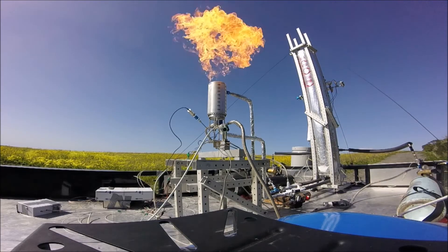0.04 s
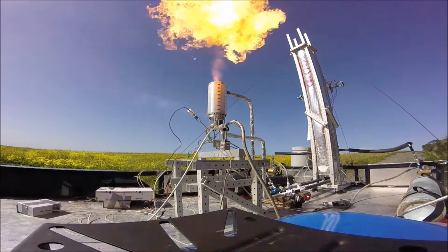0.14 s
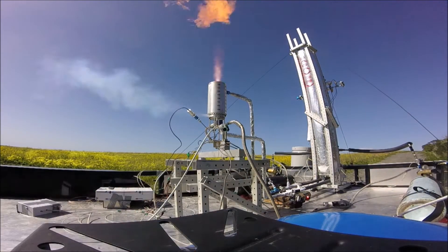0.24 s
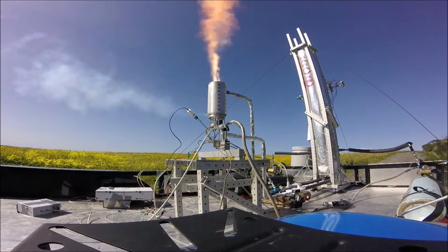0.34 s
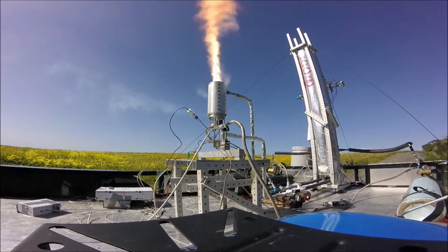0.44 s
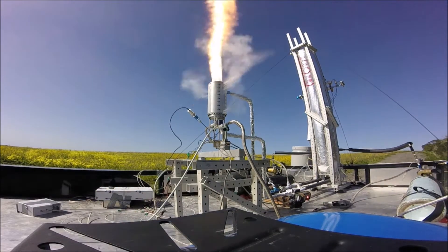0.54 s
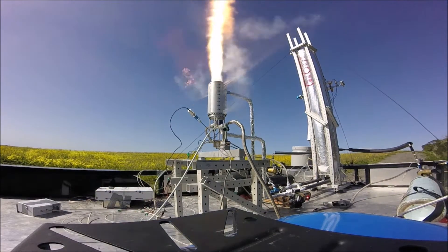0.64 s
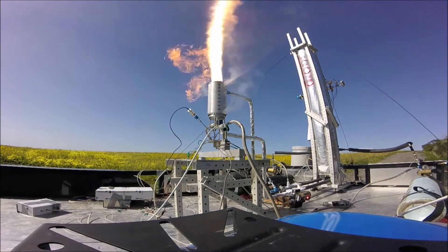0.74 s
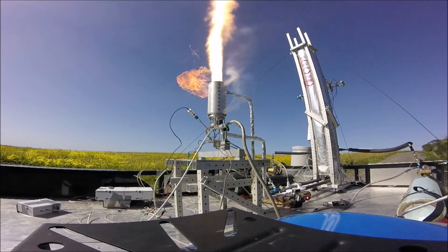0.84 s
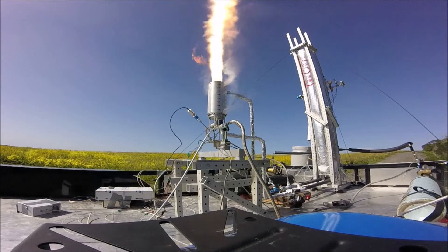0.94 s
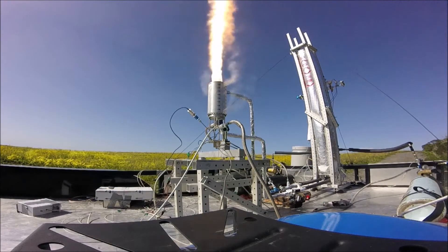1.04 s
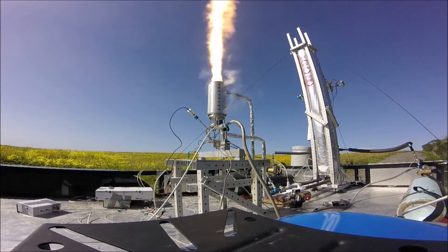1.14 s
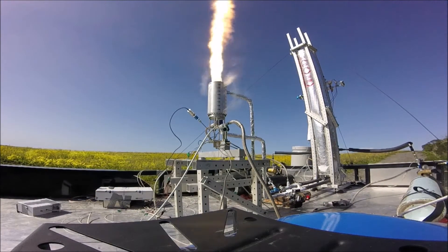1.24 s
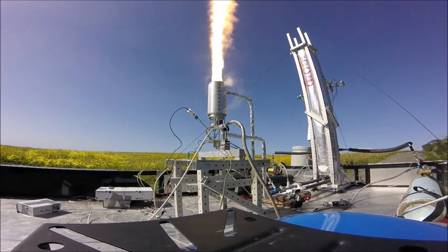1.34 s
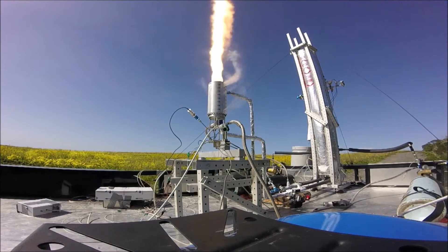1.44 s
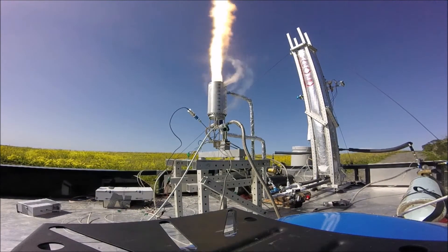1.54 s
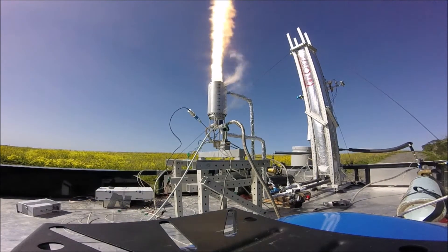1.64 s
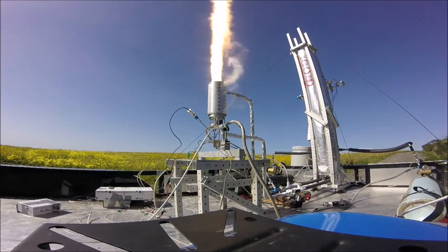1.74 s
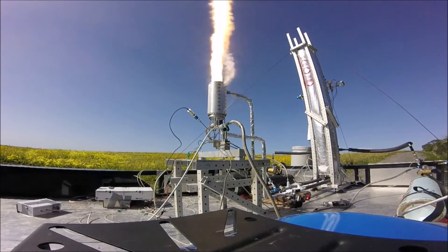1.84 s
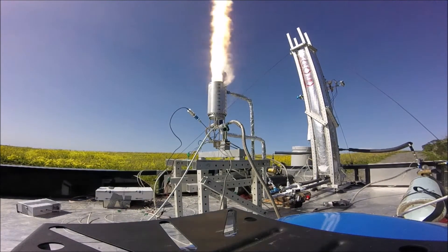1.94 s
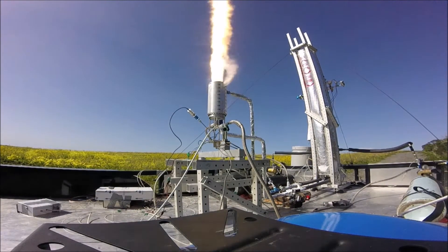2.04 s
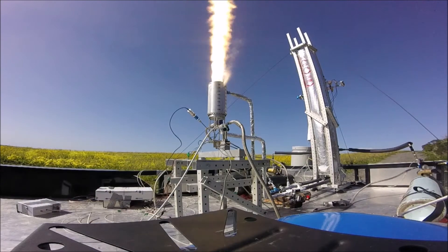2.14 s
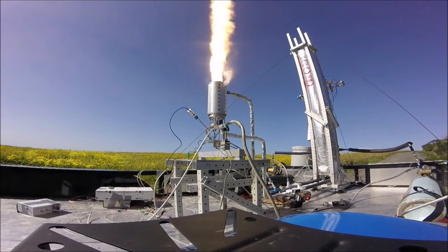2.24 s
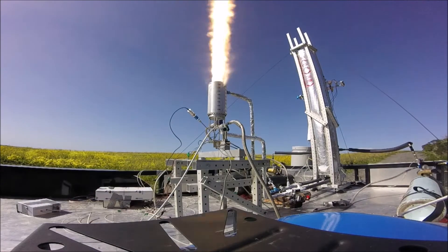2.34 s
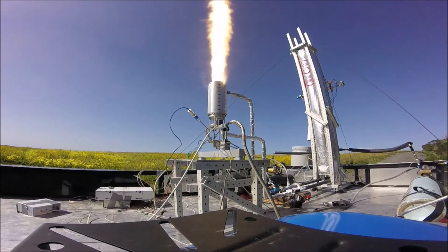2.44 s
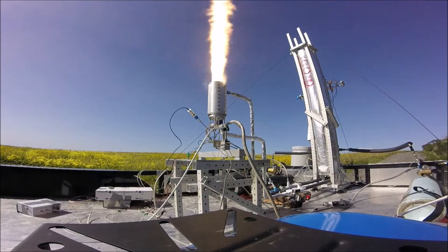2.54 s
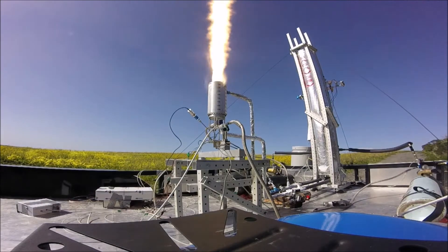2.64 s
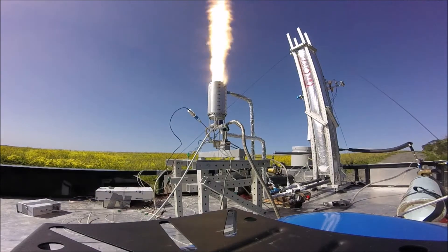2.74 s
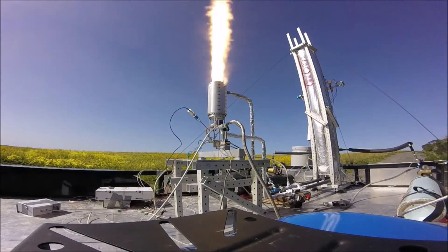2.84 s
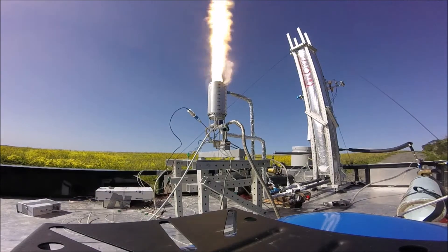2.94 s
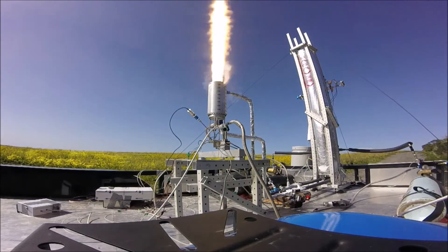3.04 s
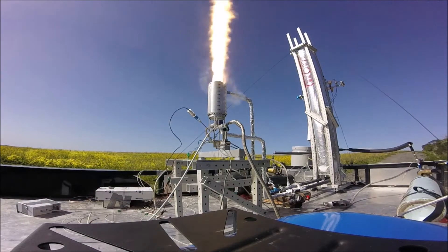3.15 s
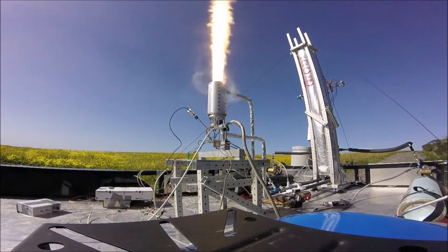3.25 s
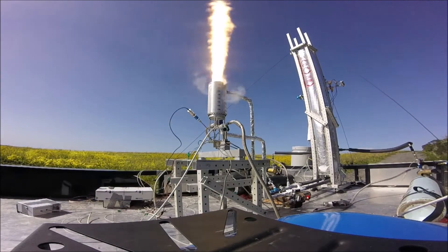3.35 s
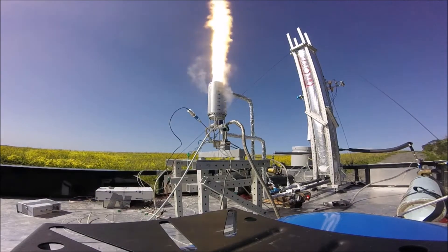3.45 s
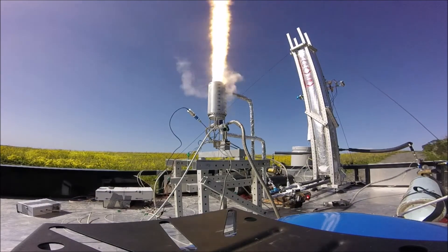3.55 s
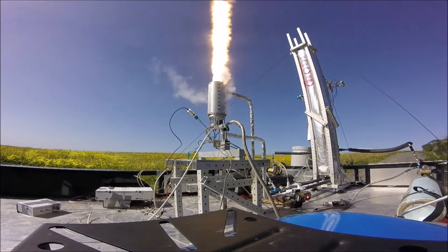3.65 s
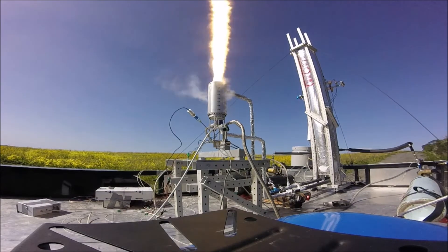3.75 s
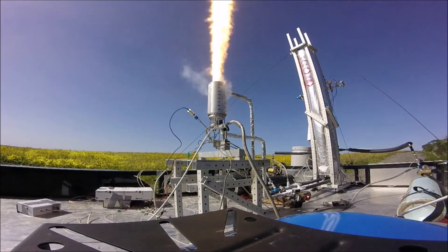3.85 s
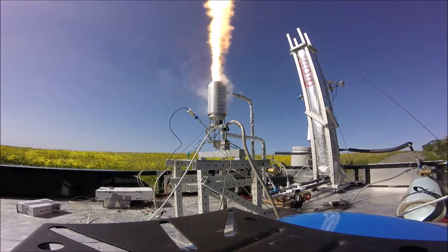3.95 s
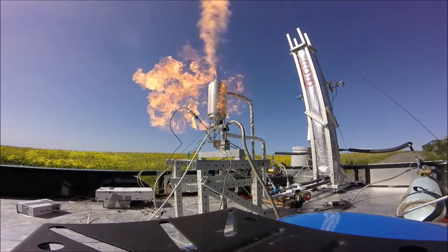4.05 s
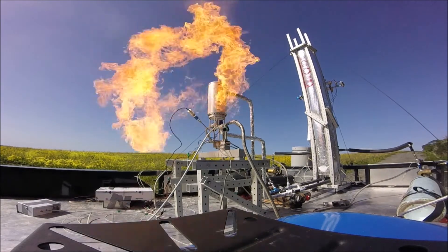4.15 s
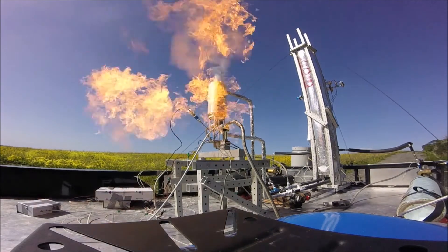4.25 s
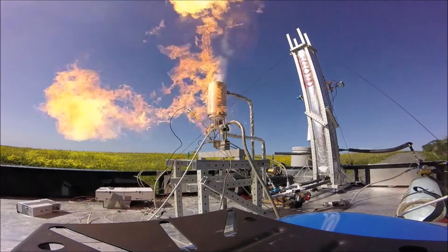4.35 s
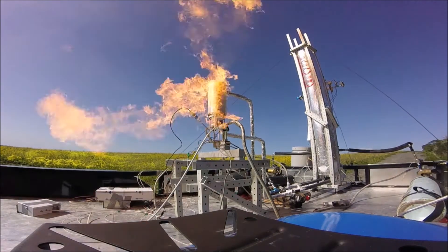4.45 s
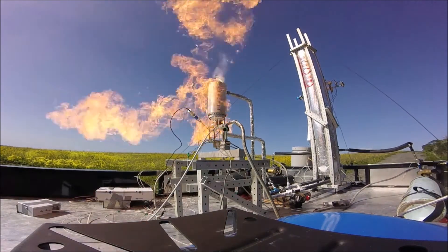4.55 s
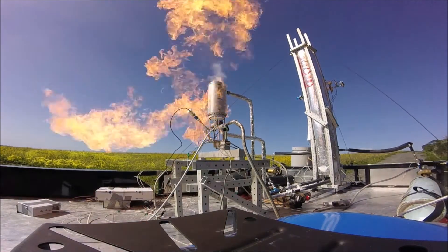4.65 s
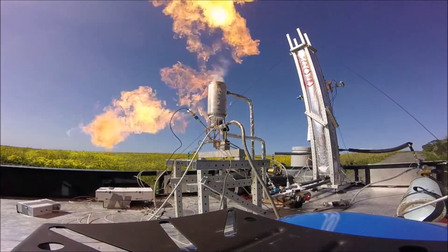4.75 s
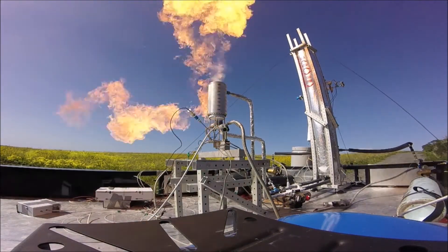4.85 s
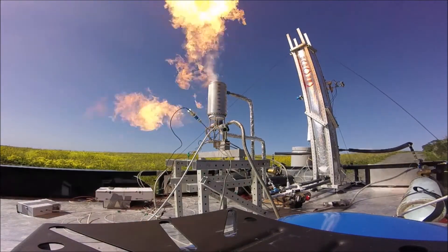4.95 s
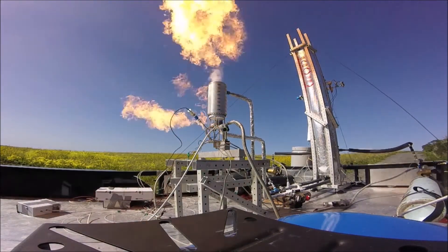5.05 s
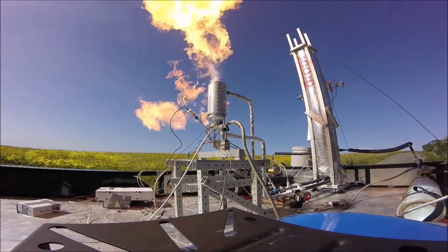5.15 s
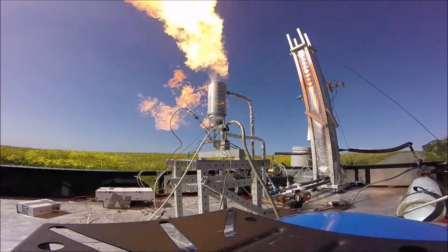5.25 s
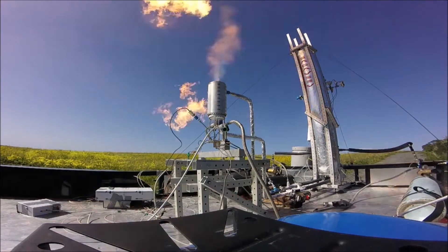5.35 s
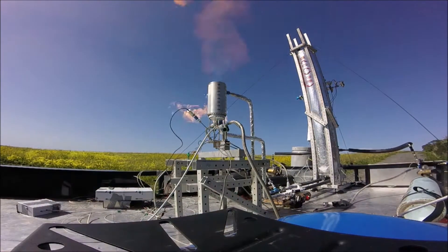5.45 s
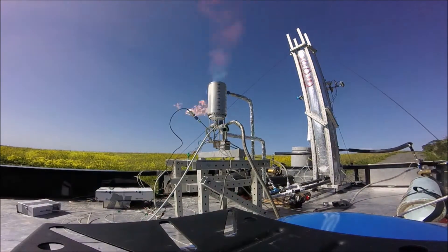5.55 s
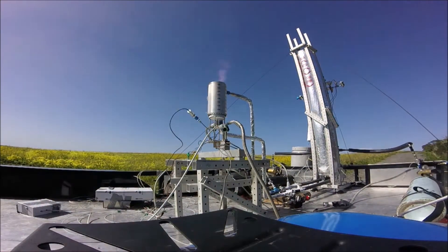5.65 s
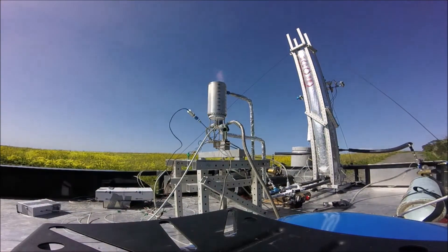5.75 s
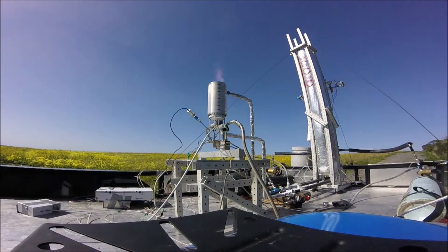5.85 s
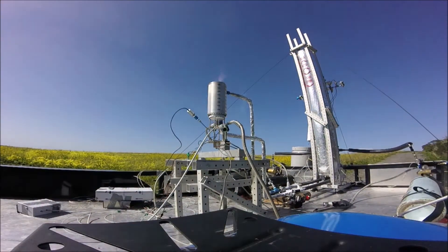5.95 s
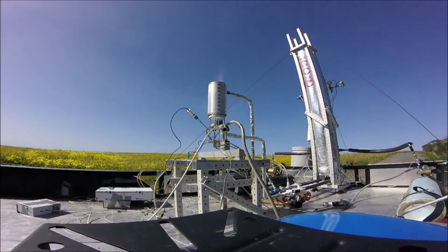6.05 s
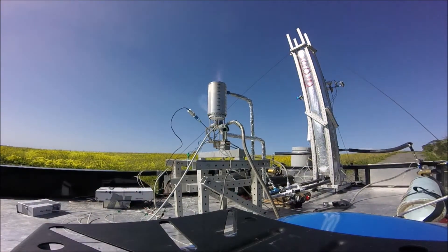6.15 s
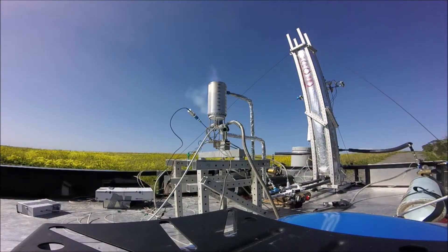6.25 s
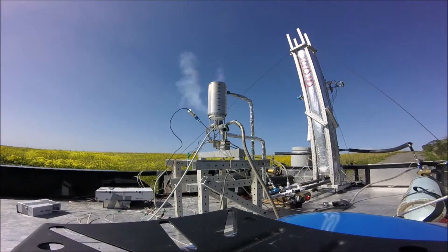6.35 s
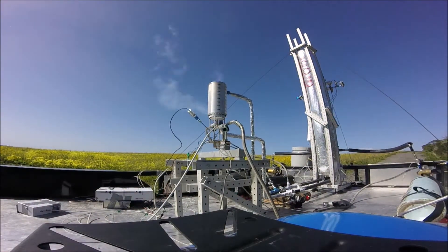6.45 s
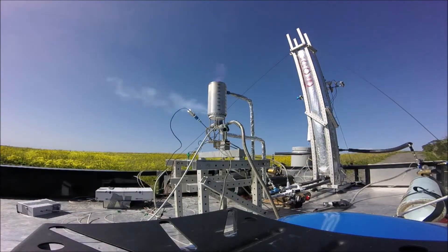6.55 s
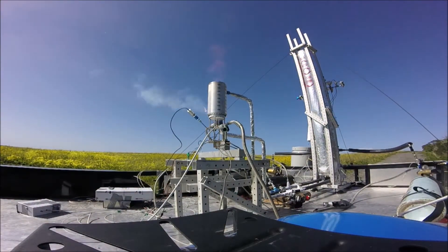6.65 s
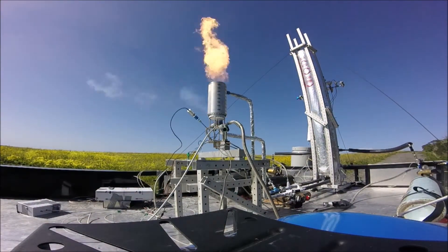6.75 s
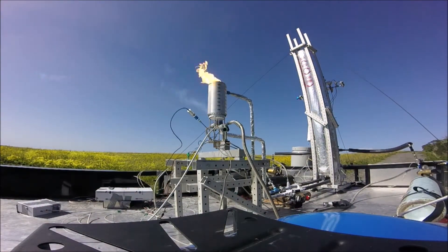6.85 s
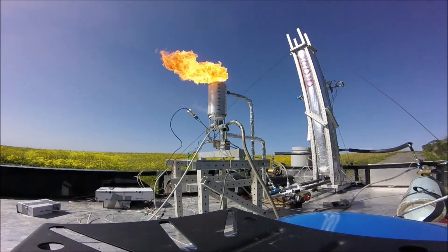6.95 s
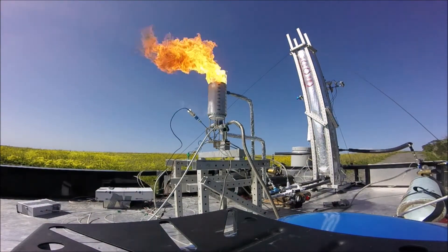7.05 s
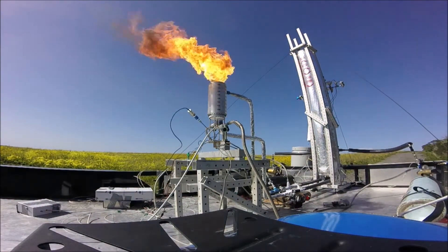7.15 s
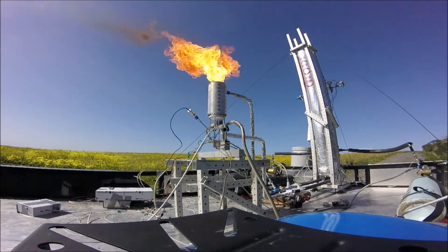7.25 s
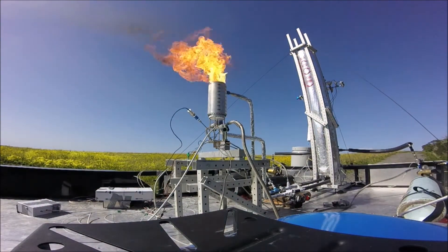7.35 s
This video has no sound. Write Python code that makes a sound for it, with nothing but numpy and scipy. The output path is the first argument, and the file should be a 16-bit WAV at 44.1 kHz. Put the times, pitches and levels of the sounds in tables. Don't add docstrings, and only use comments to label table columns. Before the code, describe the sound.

Rocket test outdoors: brief cold-gas whistle, steady harsh jet roar, sudden drop to fluttering flame rumble, bang, purge hiss, short squeak, faint ringing quiet.

```python
import sys
import numpy as np
from scipy import signal
from scipy.fft import rfft, irfft
from scipy.io import wavfile
from scipy.ndimage import uniform_filter1d

SR = 44100
rng = np.random.default_rng(int(sys.argv[2]) if len(sys.argv) > 2 else 0)


def how_loud(loudness_db):
    steps = np.asarray(loudness_db, float) / 20
    return 10 ** steps


def bounce(signal):
    frames = np.transpose(np.atleast_2d(signal))
    limited = np.clip(frames, -1, 1)
    pcm = np.round(limited * 32767).astype(np.int16)
    wavfile.write(sys.argv[1], SR, pcm)


N = 326340
T = np.arange(N) / SR
HZ = np.maximum(np.arange(N // 2 + 1) * SR / N, 1)
IGNITION_S, FLAMEOUT_S, PURGE_S, SHUT_S = .17, 4.283, 5.39, 6.895
BACKFIRE_S = (5.312, 5.388)


def in_time(rows):
    s, *columns = np.transpose(rows)
    return [np.interp(T, s, c) for c in columns]


def between(start, end):
    return np.clip(np.minimum(T - start, end - T) / .01 + .5, 0, 1)


def bumps(rows):
    out = np.zeros((2, N))
    for s, length, *strengths in rows:
        first = max(round((s - length / 2) * SR), 0)
        near = slice(first, round((s + length / 2) * SR))
        swell = np.cos(np.pi * (T[near] - s) / length) ** 2
        out[:, near] += np.outer(strengths, swell)
    return out


def along_hz(points):
    hz, db = np.transpose(points)
    return how_loud(np.interp(np.log(HZ), np.log(hz), db, left=-120, right=-120))


def lifts(modes):
    return how_loud(sum(db / (1 + ((HZ - hz) / (.5 * width)) ** 2) for hz, width, db in modes))


def rms_one(x):
    return x / np.sqrt(np.mean(x ** 2) + 1e-20)


def noise(gain):
    return rms_one(irfft(rfft(rng.standard_normal(N)) * gain, N))


def drift(rate_hz):
    return noise(1 / (1 + (HZ / rate_hz) ** 2))


def ring(x, hz, t60):
    r, w = how_loud(-60 / (t60 * SR)), 2 * np.pi * hz / SR
    return signal.lfilter([0, np.sin(w)], [1, -2 * r * np.cos(w), r * r], x + 1e-18)


def hoarse(rows, wobble, flutter_db, overtones_db):
    hz, db = in_time(rows)
    phase = 2 * np.pi * np.cumsum(hz * (1 + wobble * drift(100))) / SR
    wave = np.sin(phase)
    for multiple, lift_db in enumerate(overtones_db, 2):
        wave = wave + how_loud(lift_db) * np.cos(multiple * phase)
    level = np.sqrt(2) * how_loud(db + flutter_db * drift(70))
    return level * between(rows[0][0], rows[-1][0]) * wave


# frequency in Hz, width in Hz, gain in dB.
PANEL = [(617, 7.7, -0.5), (660, 14, -2.5), (826, 25, 4), (975, 20, 5), (1032, 25, 9), (1159, 59, 7.5),
         (1335, 31, 7), (1445, 37, 5), (1818, 36, 7), (1930, 45, 6), (2040, 34, 2), (2406, 120, 6.5),
         (3150, 39, 4.5), (3320, 53, 0.5), (4000, 50, -3.5)]


def case_colour(peaks, wall):
    power = sum((how_loud(db) / (1 + ((HZ - hz) / width) ** 2)) ** 2 for hz, width, db in peaks)
    return np.sqrt(power + along_hz(wall) ** 2) * lifts(PANEL)


# time in seconds, level in dB, brightness in dB.
FLOW = [(0, -22.5, 19), (.046, -27, -3.5), (.132, -30.5, -17.5), (.16, -29, -7), (.18, -16.5, -1.5),
        (.6, -16, 1), (4.086, -17, 1.5), (4.27, -21, 1), (4.293, -36.5, -4), (4.43, -31, -0.4),
        (5.3, -29, -2.5), (5.398, -25.5, 0), (5.494, -30.5, 1.5), (5.79, -19, 3), (6.38, -23.5, -2),
        (6.7, -31, -2), (6.86, -31.5, -3), (6.9, -46.5, -6)]
# centre in seconds, length in seconds, level in dB, brightness in dB.
SURGES = [(.105, 0.06, -0.5, -2), (.143, .04, 0, 1), (1.0, 0.37, -0.5, -1), (.2, 0.043, -3, -10.5),
          (.33, 0.038, 1.5, 0), (.41, 0.045, -1, -4), (.91, 0.091, -2, 1.5), (1.05, 0.37, -1, 2.5),
          (1.38, 0.09, -0.5, -3.5), (.36, 0.31, -1, -1), (1.75, .3, 0.6, 0), (2.3, .3, -0.8, -.5),
          (2.9, 0.36, -0.5, -2), (3.31, 0.037, -2, 5), (3.75, 0.49, -0.5, 0), (4.06, 0.14, .5, 3),
          (5.35, .014, 2.5, 2), (4.0, 0.065, 1, -2), (4.17, 0.18, -7.5, 0.5), (4.24, 0.057, 5.5, 2),
          (4.715, 0.045, 0, -2), (5.108, 0.08, 3, -1), (5.309, 0.013, 6, .1), (5.318, 0.021, 4.5, -2.5),
          (5.33, 0.017, 1, 0), (5.374, 0.015, 8, 7), (5.55, 0.086, 2.5, -5), (5.588, 0.061, -5.5, -6),
          (5.607, 0.081, 5.5, -1.5), (5.7, 0.14, 3.5, 2), (5.328, 0.011, 1, -3), (6.485, 0.037, -1.5, -0.5),
          (6.53, .015, 5, 0.5), (6.555, 0.051, 4.5, -2.5), (6.592, 0.012, 3, -1), (6.628, 0.038, -2, -2),
          (6.649, 0.015, 5, -4), (6.77, .016, -2.5, 0), (6.41, 0.037, 4, -1.5), (6.745, 0.014, 7, -3),
          (6.785, 0.019, 9.5, 5), (6.815, 0.065, 9, 7.5), (6.87, 0.018, 5, 1)]


def flow():
    backfire_level_db, backfire_bright_db = 7, -4.5
    backfire = np.outer([backfire_level_db, backfire_bright_db], between(*BACKFIRE_S))
    return in_time(FLOW) + bumps(SURGES) + backfire


JET_EDGES_HZ = [800, 2000, 4500, 15500]
BRIGHT_SHARES = (-0.83, 0, 0.13)
# low, middle and high range in dB.
RANGES_DB = [(-4, 0.003, -8), (5.5, 0, -10.5), (4.5, 0.01, -6.5)]
PRIMING_DB = (-0.5, 5.5, 5.5)
# frequency in Hz, width in Hz, level in dB.
CASE = [(1486, 142, 0), (1770, 15, -10.5), (2663, 135, -3.5), (3234, 210, 0), (3788, 69, -3),
        (4186, 160, -12), (5890, 417, -9), (6980, 320, -14), (7400, 120, -23.5), (8500, 670, -12.5),
        (12830, 550, -28.5)]
# frequency in Hz, level in dB per Hz.
WALL = [(700, -36), (1100, -23), (2200, -10.5), (3500, -8.5), (4800, -23), (6500, -33.5), (9500, -20.5),
        (11000, -29), (15500, -40.5)]
# frequency in Hz, width in Hz, gain in dB.
JET_DIPS = [(1050, 25, -5), (1345, 12, -5), (1415, 15, -2.5), (1756, 44, -13), (1884, 30, -4), (2006, 40, -5),
            (3560, 200, -1), (4070, 50, -4), (4290, 80, -2.5), (9650, 370, -9.5), (10860, 500, -2.5),
            (12250, 600, -4), (13550, 900, -2)]
# frequency in Hz, width in Hz, level in dB.
CASE_FLAME = [(972, 30, -5), (1444, 137, 5), (2680, 160, -13.5), (3190, 260, -14.5), (3840, 58, -13),
              (4160, 42, -16.5), (6060, 620, -22.5), (7640, 63, -29), (8580, 450, -25), (11300, 250, -50)]
# frequency in Hz, level in dB per Hz.
WALL_FLAME = [(700, -22), (1000, -11.5), (2100, -18), (3500, -17), (5000, -40), (7800, -35.5), (9700, -45),
              (12000, -45), (15500, -59)]
# frequency in Hz, width in Hz, level in dB.
CASE_SIDE = [(1475, 116, 3.5), (2636, 70, -11), (3293, 206, -12.5), (3825, 87, -15.5), (4060, 68, -16),
             (6000, 320, -19), (6730, 270, -25), (8600, 360, -18), (9100, 220, -28.5), (12000, 600, -39),
             (12760, 600, -46.5)]
# frequency in Hz, level in dB per Hz.
WALL_SIDE = [(700, -20), (1100, -16.5), (2100, -20.5), (3500, -22.5), (5000, -35), (6500, -31), (7800, -35),
             (9700, -39.5), (11000, -47), (15500, -57)]
# frequency in Hz, width in Hz, gain in dB.
PRIMING_COLOUR = [(8700, 1000, -9.5), (7100, 550, 9), (12630, 5400, 2), (5790, 500, 6), (2500, 400, -7.5),
                  (5000, 500, 4), (3800, 300, 2)]


def jet(surge_db, own_db, crackle_db):
    vent_colour = case_colour(CASE_SIDE, WALL_SIDE)
    unlit = between(-1, IGNITION_S)
    stages = [(between(IGNITION_S, FLAMEOUT_S), case_colour(CASE, WALL) * lifts(JET_DIPS)),
              (between(FLAMEOUT_S, PURGE_S), case_colour(CASE_FLAME, WALL_FLAME)),
              (between(PURGE_S, 9), vent_colour),
              (unlit, vent_colour * lifts(PRIMING_COLOUR))]
    backfire_db = (-1, -2, -6.5)
    dry_db = (-2.5, -.2, -3)
    closing_db_per_s = (60, 36, 220)
    running_dry = np.clip((T - 6.41) / .21, 0, 1)
    closing_s = np.clip(T - 6.82, 0, None)
    white = rfft(rng.standard_normal(N))
    shared_db = surge_db * drift(9) + crackle_db * drift(150)
    flicker_db = own_db + 1.5 * unlit
    level_db, bright_db = flow()
    out = np.zeros(N)
    for k, (low, high) in enumerate(zip(JET_EDGES_HZ, JET_EDGES_HZ[1:])):
        inside = white * (HZ >= low) * (HZ < high)
        band = np.zeros(N)
        for (share, colour), balance_db in zip(stages, list(RANGES_DB) + [PRIMING_DB]):
            band += share * how_loud(balance_db[k]) * rms_one(irfft(inside * colour, N))
        band *= how_loud(backfire_db[k] * between(*BACKFIRE_S) + dry_db[k] * running_dry)
        band *= how_loud(-closing_db_per_s[k] * closing_s)
        out += band * how_loud(level_db + BRIGHT_SHARES[k] * bright_db + shared_db + flicker_db * drift(15))
    return out * np.clip((SHUT_S + .029 - T) / .03, 0, 1)


# time in seconds, pitch in Hz, level in dB.
WHISTLE = [
    (0, 1548, -30),
    (.04, 1500, -22.5),
    (.08, 1440, -18.5),
    (.105, 1398, -20.5),
    (.14, 1406, -19.5),
    (.158, 1437, -14.5),
    (.175, 1465, -11.5),
]


def chamber():
    return hoarse(WHISTLE, wobble=.014, flutter_db=2.5, overtones_db=[-30])


# time in seconds, rumble level in dB.
FLAME = [(0, -58), (.17, -43), (.6, -51), (4.1, -45.5), (4.27, -31.5), (4.66, -30.5), (4.87, -35.5),
         (5.22, -23), (5.41, -39), (5.47, -41), (5.84, -43.5), (6.06, -55), (6.42, -52), (6.48, -45.5),
         (7.4, -44)]
# centre in seconds, length in seconds, rumble in dB, flutter in dB.
GUSTS = [(.27, 0.39, -8, -10), (.45, 0.56, 3.5, 3), (1.27, 0.96, 6, -2.5), (2.05, 0.24, 3, 0.5),
         (2.62, 0.22, -12, 4), (3.41, 0.23, -6, -0.5), (4.32, 0.15, 4.5, -6), (4.39, 0.12, 5.5, -2.5),
         (5.1, 0.18, 1.5, -1.5), (6.6, 0.99, 1, 4.5), (7.04, .08, -7, -0.5), (7.095, .05, 4, .1),
         (4.18, 0.12, -4, 1.5), (4.2, .06, 2, 2), (4.5, 0.061, -7, 1), (5.0, 0.074, -8, 5.5),
         (5.33, 0.059, 1, 4), (4.25, 0.055, -6, -1.5), (4.455, .04, 4, -0.5), (4.55, 0.057, 3, -2.5),
         (4.67, 0.1, 3, -5), (4.76, 0.055, -6, -4), (4.81, .04, 6, .1), (4.88, .05, -3, -3),
         (5.24, 0.059, 2, 7), (5.17, 0.061, -1, 0.5), (6.98, 0.047, 3, .1), (7.125, .04, -10, .1),
         (7.245, .05, 3, .1), (7.28, .04, -3.5, .1), (7.38, .06, 2, .1)]
# frequency in Hz, level in dB per Hz.
RUMBLE = [(12, -34), (20, -10), (43, -16.5), (62, -3.5), (86, 1.5), (107, 2), (128, -5), (146, -14.5),
          (210, -30), (350, -120)]
# frequency in Hz, level in dB per Hz.
FLUTTER = [(76, -35.5), (130, -12), (167, -9.5), (198, -4.5), (237, -7.5), (322, 0), (366, -6), (424, 1),
           (523, -10), (567, -5.5), (900, -5.5), (1170, -6), (1980, -120)]
FLUTTER_DB = (-49.5, -37, -34.5, -34.5)
# frequency in Hz, width in Hz, gain in dB.
FRAME = [(74.3, 8.3, 9), (99.7, 8.8, 4.5), (208.4, 9.3, 6.5)]


def flame():
    gust_db, gust_flutter_db = bumps(GUSTS)
    rumble_db = in_time(FLAME)[0] + gust_db
    level_db, bright_db = flow()
    stage_s = (-1, IGNITION_S, FLAMEOUT_S, PURGE_S, 9)
    flutter_db = gust_flutter_db
    for db, start, end in zip(FLUTTER_DB, stage_s, stage_s[1:]):
        flutter_db = flutter_db + db * between(start, end)
    flutter_db += .46 * (level_db - bright_db + 21) + .21 * (rumble_db + 49)

    rumble = noise(along_hz(RUMBLE) * lifts(FRAME))
    lump = int(.05 * SR)
    lumps = uniform_filter1d(uniform_filter1d(rumble ** 2, lump), lump)
    evened = .37
    rumble = rumble / (lumps + .02) ** (evened / 2) * how_loud(1.7 * drift(7.3))
    top_hz = 128
    rumble = rms_one(irfft(rfft(rumble) / np.sqrt(1 + (HZ / top_hz) ** 12), N))

    flutter = rms_one(noise(along_hz(FLUTTER) * lifts(PANEL + FRAME)) * how_loud(1.1 * drift(25)))
    lows = irfft(rfft(flutter) * (HZ < 338), N)
    flutter = flutter - .47 * lows * between(PURGE_S, 9)
    return how_loud(rumble_db) * rumble + how_loud(flutter_db) * flutter * between(-1, SHUT_S)


# start in seconds, peak in dB, corner in Hz, share into the case resonances in dB.
POPS = [(.878, -14, 200, -30), (.896, -24, 500, -30), (.972, -20, 250, -30), (4.178, -29, 350, -30),
        (4.205, -25, 350, -30), (4.228, -24, 220, -30), (4.25, -27, 350, -30), (5.235, -20, 90, -40),
        (5.03, -22, 120, -40), (5.087, -15, 170, -40), (5.275, -23, 250, -40), (7.09, -44, 60, -60),
        (5.328, -20, 300, -8), (5.601, -24, 900, -6), (6.752, -45, 900, 14), (6.868, -48, 900, 8),
        (7.385, -40, 120, -60), (.1705, -16, 500, 6), (5.29, -24, 200, -40), (5.3855, -9, 200, 3)]
SUCTION_S = (.87, .89, .96, .98)


def pops():
    push, crack = np.zeros(N), np.zeros(N)
    for s, db, hz, case_db in POPS:
        near = slice(round(s * SR), round((s + .05) * SR))
        after = T[near] - s
        turn = 2 * np.pi * hz * after
        sign = (-1) ** np.searchsorted(SUCTION_S, s)
        push[near] += sign * how_loud(db) * np.e * turn * np.exp(-turn)
        burst = np.exp(-(after / .004) ** 4) + how_loud(-12.5) * np.exp(-after / .0032)
        crack[near] += how_loud(db + case_db) * burst
    crack_top = signal.butter(2, 10900, fs=SR, output="sos")
    crack = signal.sosfilt(crack_top, crack * rng.standard_normal(N) + 1e-18)
    rings = np.zeros(N)
    for hz, width, db in CASE:
        rings += how_loud(db - 14) * (width / 200) ** .5 * ring(crack, hz, .8 / width)
    push = signal.sosfilt(signal.butter(2, 30, "high", fs=SR, output="sos"), push)
    return push + rings + how_loud(-21) * crack


def hum():
    start_s, length_s, hz, db, t60_s = .575, .092, 197, -27.5, .9
    after = np.clip(T - start_s, 0, None)
    swell = np.clip(np.minimum(after, length_s - after) / .016, 0, 1)
    return how_loud(db - 60 * after / t60_s) * swell * np.sin(2 * np.pi * hz * after)


# time in seconds, pitch in Hz, level in dB.
SQUEAK = [
    (6.75, 678, -34),
    (6.775, 628, -26),
    (6.808, 587, -22),
    (6.835, 677, -21),
    (6.856, 650, -22.5),
    (6.88, 385, -28),
    (6.897, 420, -34),
]
SQUEAK_OVERTONES_DB = (-14.5, -16, -18, -16, -28)


def valve():
    return hoarse(SQUEAK, wobble=.038, flutter_db=4, overtones_db=SQUEAK_OVERTONES_DB)


# frequency in Hz, level in dB, t60 in seconds, width in Hz.
PIPES = [(409, -59, 8.4, 7.5), (529.5, -41.5, 1.54, 2.2), (1314, -72, 1.5, 40), (1497, -64, 8.0, 15),
         (1776, -54.5, 1.3, 10), (1860, -57, .6, 25), (1920, -61, 4.0, 4), (2600, -70, 5.0, 5),
         (205, -61, 2.0, 9), (1071, -68, 2.0, 8), (2300, -72, 3.0, 10)]
# frequency in Hz, level in dB per Hz.
ECHO = [(700, -40), (850, -17), (1270, -6.5), (1600, -21), (1900, -12), (2130, -20), (3070, -25),
        (9000, -70)]
# frequency in Hz, level in dB per Hz.
AIR = [(130, -28.5), (200, 2), (250, -11), (330, -4), (700, -8), (1110, -13), (1480, -6), (2000, -17),
       (2150, -23), (2630, -10.5), (2870, -19), (8770, -32), (14000, -41.5)]
# frequency in Hz, width in Hz, gain in dB.
AIR_CAVITY = [(5900, 500, 4.5), (8600, 900, 7)]


def afterglow():
    start = round(SHUT_S * SR)
    after = T[:N - start]
    out = how_loud(-56.5) * noise(along_hz(AIR) * lifts(AIR_CAVITY))
    out[start:] *= how_loud(-10 * np.exp(-after / .23))
    echo_db, echo_t60_s = -43, .7
    tail = how_loud(echo_db - 60 * after / echo_t60_s) * noise(along_hz(ECHO))[start:]
    for hz, db, t60, width in PIPES:
        wander = np.cumsum(rng.standard_normal(N - start)) * np.sqrt(2 * np.pi * width / SR)
        phase = 2 * np.pi * hz * after + uniform_filter1d(wander, size=200)
        tail = tail + np.sqrt(2) * how_loud(db - 60 * after / t60) * np.sin(phase)
    out[start:] += tail * np.minimum(after / .0092, 1)
    return out


def scene():
    gas = jet(surge_db=.4, own_db=.5, crackle_db=.6) + chamber()
    return (gas + flame() + pops() + hum() + valve() + afterglow())[None]


BAND_HZ = 340


def threadbare(x):
    frame_s, odds, lost_share, from_hz = 1024 / SR, .45, .6, 1700
    out, near = x.copy(), slice(0, SR // 4)
    hz, spectrum = np.fft.rfftfreq(SR // 4, 1 / SR), rfft(x[near])
    band = (hz // BAND_HZ).astype(int)
    unlit = between(-1, IGNITION_S - .005)[near]
    for s in np.arange(0, IGNITION_S, frame_s):
        lost = (rng.random(SR // BAND_HZ) < odds)[band] * (hz > from_hz)
        during = np.cos(np.pi / 2 * np.clip((T[near] - s) / frame_s, -1, 1)) ** 2 * unlit
        out[near] -= lost_share * during * irfft(spectrum * lost, SR // 4)
    return out


# centre in seconds, length in seconds, share lost in the gap, gap from Hz, to Hz.
STARVED = [(.083, .155, .88, 600, 1150), (.05, .03, .6, 2300, 2700), (.13, .06, .6, 1900, 2450),
           (.09, .03, .5, 3500, 4300), (.055, .02, .5, 7200, 8300), (.155, .02, .4, 4500, 5600),
           (1.285, .018, .7, 340, 700), (4.015, .016, .85, 350, 1000), (4.166, .02, .6, 500, 1000),
           (4.218, .034, .95, 350, 1080), (4.72, .015, .3, 500, 760), (4.805, .015, .3, 500, 700),
           (4.912, .014, .3, 500, 800), (5.008, .033, .5, 490, 640), (5.172, .002, .05, 450, 700),
           (5.232, .015, .05, 450, 700), (6.139, .032, .99, 20, 730), (6.395, .031, .99, 20, 730),
           (6.577, .013, .2, 100, 400), (6.64, .013, .2, 100, 400), (7.07, .02, .6, 3500, 9000)]
TREBLE_LOST = (0.091, 0.96, 1)
# from Hz, to Hz.
WEAK_LOW_HZ = (1590, 2100)
# from Hz, to Hz.
WEAK_HIGH_HZ = [(4350, 5600), (7000, 8150), (9350, 15500)]
# from Hz, to Hz.
BRIEF_WEAK_HZ = [(4100, 4350), (6250, 7000)]


def starve(x):
    out = x.copy()
    for s, length, low_share, *gap_hz in STARVED:
        brief = length < .025
        stage = int(s > IGNITION_S) + int(s > FLAMEOUT_S)
        high_share = max(TREBLE_LOST[stage], low_share * (s > IGNITION_S))
        near = slice(max(round((s - length - .05) * SR), 0), round((s + length + .05) * SR))
        part, hz = out[near].copy(), np.fft.rfftfreq(len(x[near]), 1 / SR)

        weak = low_share * (hz > gap_hz[0]) * (hz < gap_hz[1])
        if gap_hz[0] < BAND_HZ + 5:
            in_low = (hz > WEAK_LOW_HZ[0]) * (hz < WEAK_LOW_HZ[1])
            weak += (1 - weak) * low_share * high_share * in_low
        for low, high in WEAK_HIGH_HZ + BRIEF_WEAK_HZ * brief:
            weak += high_share * (hz > low) * (hz < high)
        luck = rng.random(SR // BAND_HZ)
        spared = ((luck < .08) + .3 * luck ** 2) * brief
        weak = np.minimum(weak, 1) * (1 - .78 * spared[(hz // BAND_HZ).astype(int)])
        during = np.clip((length / 2 - abs(T[near] - s)) / .013 + .55, 0, 1)
        out[near] -= during * irfft(rfft(part) * weak, len(part))
    return out


def top_cut(x):
    return signal.sosfilt(signal.butter(12, 15450, fs=SR, output="sos"), x)


def record(dry):
    overloaded = dry[0] / (1 + dry[0] ** 4) ** .25
    x = threadbare(starve(overloaded))
    x = signal.sosfilt(signal.ellip(10, .1, 70, 15280, fs=SR, output="sos"), x)
    return top_cut(x[None])


dry = scene()
out = record(dry)
bounce(out)
```